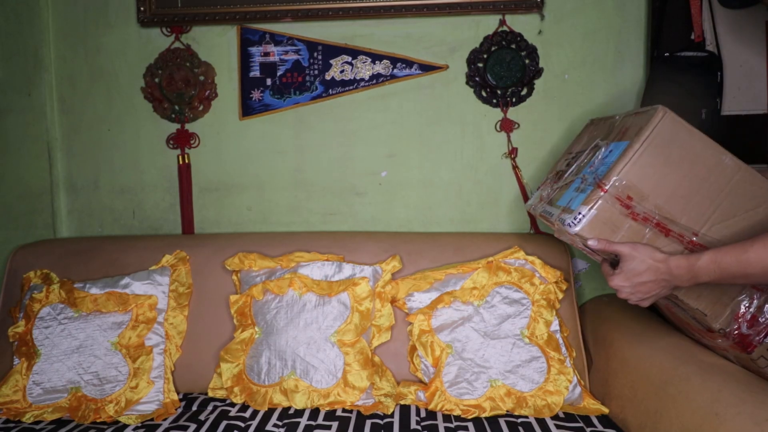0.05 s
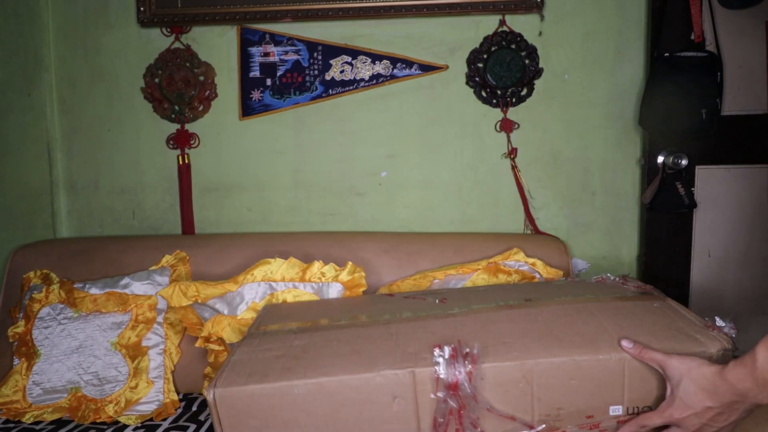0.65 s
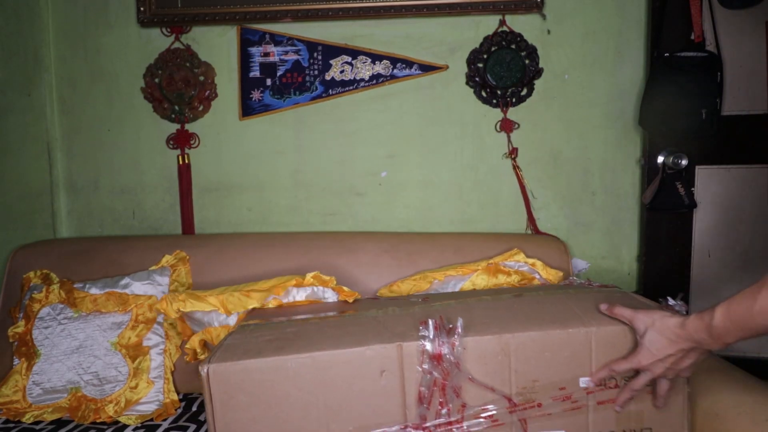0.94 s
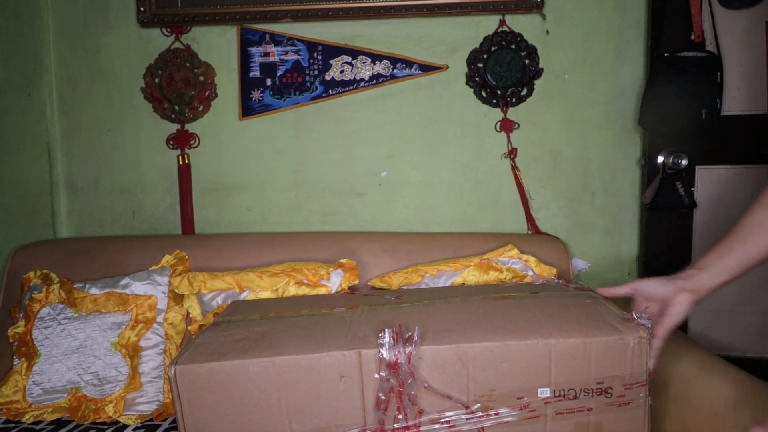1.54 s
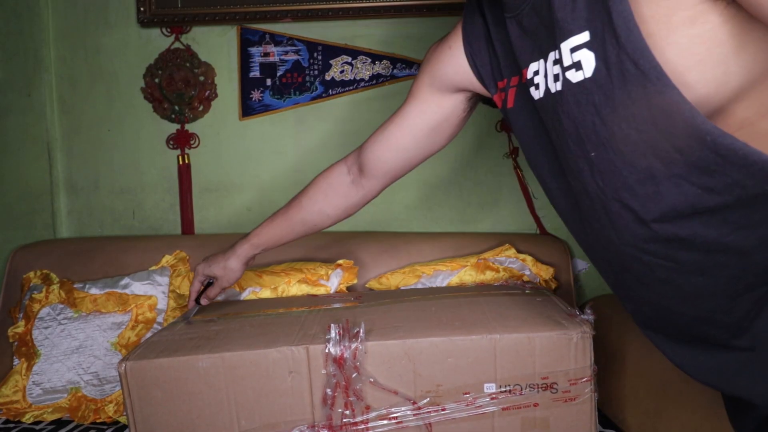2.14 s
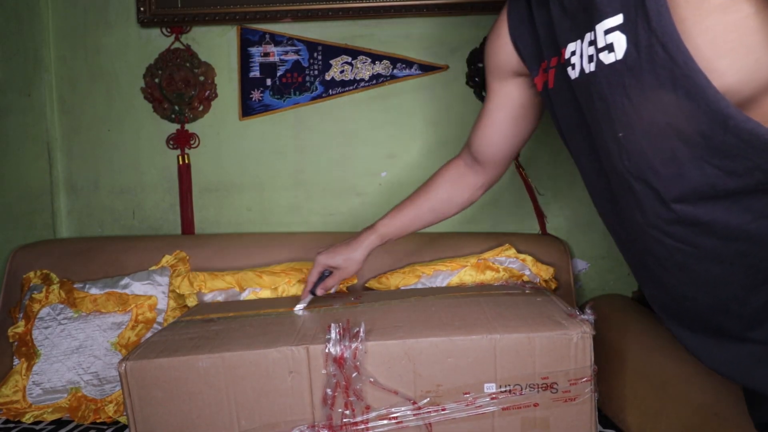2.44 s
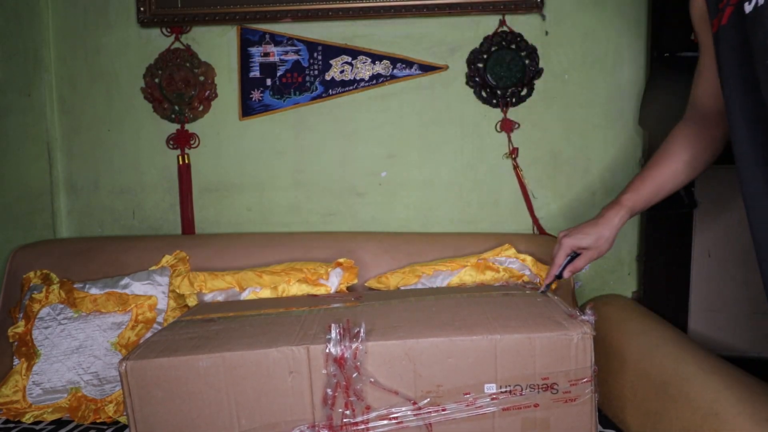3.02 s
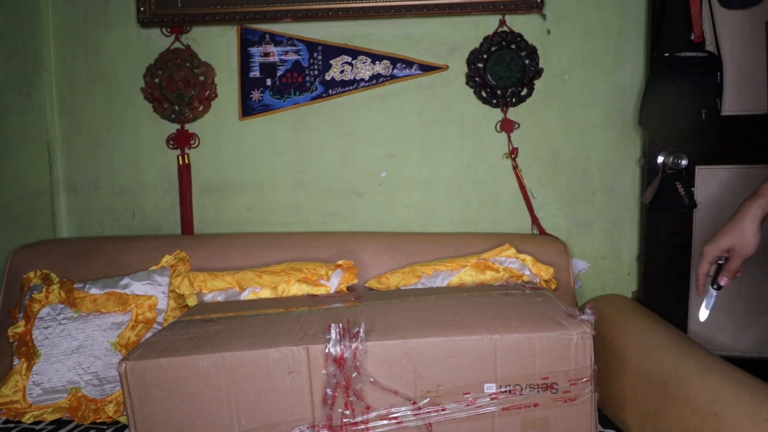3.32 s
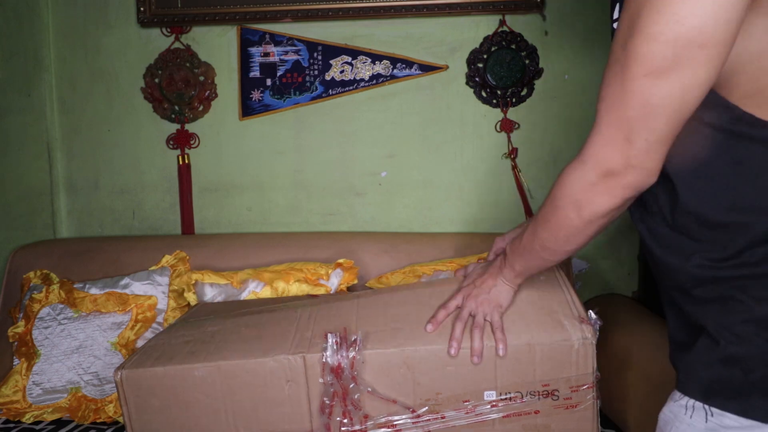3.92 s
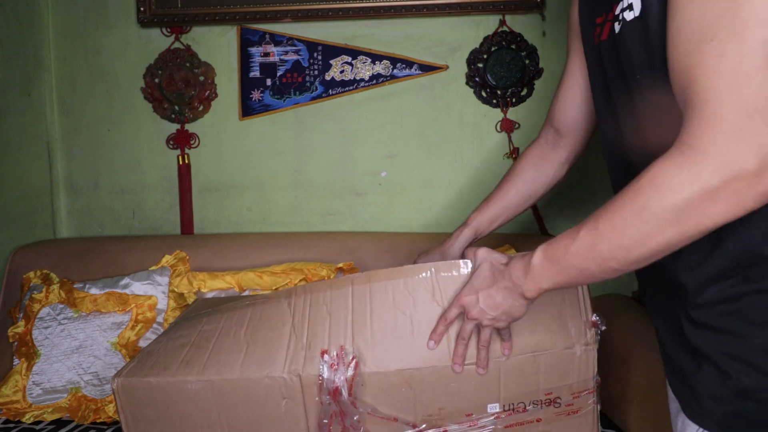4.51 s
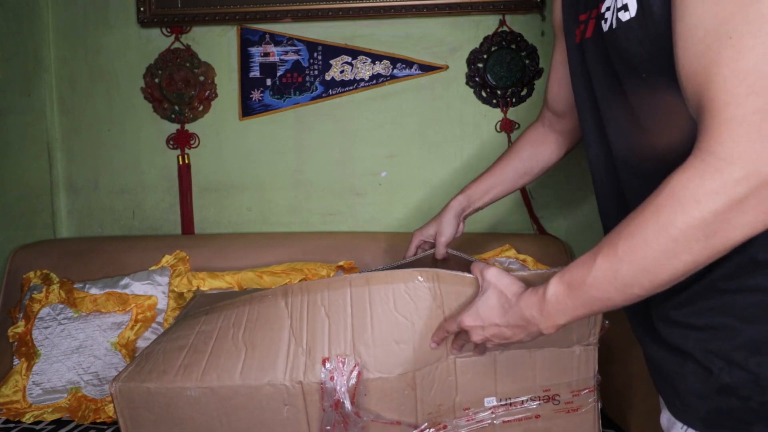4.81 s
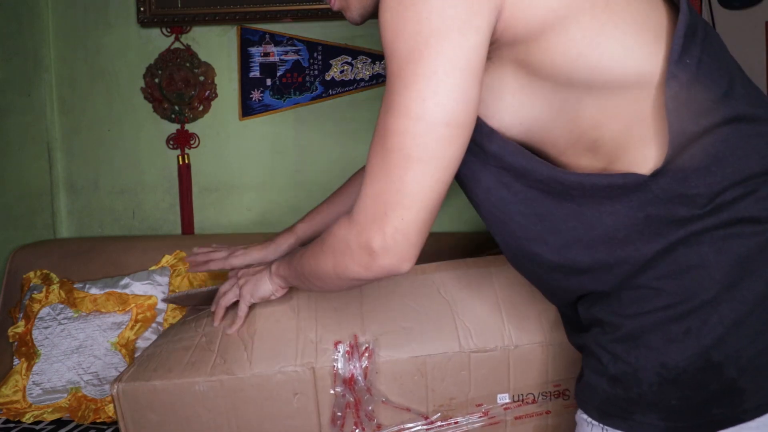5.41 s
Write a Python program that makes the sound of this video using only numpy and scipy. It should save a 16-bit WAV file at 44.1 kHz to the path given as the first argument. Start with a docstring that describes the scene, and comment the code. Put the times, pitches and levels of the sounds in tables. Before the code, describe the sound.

A large taped cardboard box scrapes onto a sofa from the start, its tape crackling, and settles with several dull thuds between 0.5 and 0.9 seconds. Hands swish over the card, and a palm drags with a brief low groan at about 1.1 seconds. A cluster of hollow knocks comes near 1.7 seconds as the box is pushed into place. From about 2.3 to 3.3 seconds a knife rasps along the seam, catching on fibres and drumming on the lid, ending with sharp ticks. After a short lull the flap is pulled, and the tape bursts in three loud snaps at about 4.0, 4.5 and 5.15 seconds, each ringing the box, with light rubbing between them. Scuffs and thumps follow until around 5.6 seconds. Everything sounds close, in a small room with a short echo and a faint steady hiss.

```python
"""In a small room, a big taped cardboard box is slid onto a sofa and pushed into place with dull thuds.
A knife is drawn along the top seam, catching on fibres and drumming on the lid. Then the flap is
pulled and the remaining tape bursts in three sharp snaps. Knocks, slides and snaps all ring the same
cardboard panels; hands swish over the card, the tape crackles and the room hisses faintly."""
import sys
import numpy as np
from scipy import signal
from scipy.fft import rfft, irfft, next_fast_len
from scipy.io import wavfile
from scipy.ndimage import uniform_filter1d

SR = 44100
rng = np.random.default_rng(int(sys.argv[2]) if len(sys.argv) > 2 else 0)


def unload_wav(signal):
    """Save mono or channel-first audio to the path in sys.argv[1] as 16-bit WAV at rate SR, clipped to [-1, 1]."""
    wavfile.write(
        sys.argv[1],
        SR,
        np.round(np.clip(np.atleast_2d(signal).T, -1, 1) * 32767).astype(np.int16),
    )


N = 249297
TIME = np.arange(N) / SR

# Levels in the tables are relative: the functions add their own gains.
# hands and cushions rub the box: start_s, attack_s, hold_s, scrape_db, drone_db, crackle_db
RUBS = [(0.021, 0.056, .01, -46, -52, -50), (0.144, 0.23, .06, -33.5, -39.5, -37.5),
        (0.492, 0.013, 0.15, -38.5, -29.5, -41.5), (0.716, 0.054, 0.05, -39, -34.5, -49),
        (0.985, 0.016, .01, -39.5, -49, -45), (1.028, 0.079, 0.1, -40, -45, -40.5),
        (1.287, 0.033, 0.0092, -41.5, -40, -44.5), (1.741, .015, .08, -40.5, -39, -47),
        (1.897, 0.032, 0.036, -43.5, -47, -53), (4.113, 0.025, .04, -46, -47.5, -58),
        (4.331, .016, 0.12, -47.5, -44, -52), (4.644, 0.028, 0.18, -47, -54, -51),
        (4.87, 0.025, 0.24, -43, -47, -46), (5.27, 0.041, 0.07, -40.5, -32.5, -55),
        (5.427, .03, .14, -45.5, -54, -54)]
# tone of the droning panels: pitch_hz, level_db
DRONE_TONE = [(50, -21), (100, -12.5), (160, -6.5), (240, -2.5), (340, -7), (430, -2), (600, -25.5),
              (1000, -38), (2000, -57)]
# tone of scraped cardboard: pitch_hz, level_db
SCRAPE_TONE = [(250, -41), (600, 6), (1100, 2), (2200, -2.5), (3500, -4.5), (5500, -11), (9000, -15),
               (15000, -32)]
# tone of crackling tape: pitch_hz, level_db
CRACKLE_TONE = [(2000, -43), (4000, -9), (6500, 4.5), (9500, -8.5), (15000, -9)]
# ringing notes of the box's panels and the air inside: pitch_hz, level_db, fade_s
BOX_NOTES = [(71, -3, 0.098), (95, -27, 0.099), (126, -0.5, 0.31), (157.7, 4, 0.18), (248, -1, 0.14),
             (290.4, -7, 0.092), (363.3, 2.5, 0.26), (553, -2, 0.13), (988, 5, 0.094), (1160, -26, 0.14),
             (1384, -4, 0.17), (1613, 0, 0.16), (1994, 1.5, 0.19), (2368, -26, .12), (2500, 2.5, 0.17),
             (3050, 4, 0.33), (3323, 7.5, 0.18)]
# gaps between the lid's notes, where it gives off little sound: pitch_hz, width_hz, depth (0 to 1)
LID_GAPS = [(452, 420, 0.29), (886, 700, 0.38)]
# the clearest ticks of tape and blade: start_s, level_db, pitch_hz
TICKS = [(0.0263, -31, 7440), (0.2184, -22, 4230), (0.3905, -15, 3630), (0.3985, -10, 4070),
         (0.4044, -19, 4250), (0.7557, -19.5, 5970), (0.8225, -25.5, 6400), (1.1338, -23.5, 6400),
         (1.1418, -20, 5560), (1.2974, -27, 6230), (1.3209, -18, 6430), (1.8352, -23.5, 3900),
         (2.0812, -32, 3370), (2.5087, -15.5, 3620), (3.1557, -22, 6740), (3.1607, -14.5, 5700),
         (3.1644, -15.5, 3670), (4.1225, -34, 3990), (4.3026, -30, 3210), (4.7077, -20, 7440),
         (4.8678, -24.5, 6230), (4.9054, -16, 5940), (5.0739, -29, 4360)]
# dry skin swishes over smooth card: start_s, length_s, level_db
SWISHES = [(0.05, 0.07, -57), (0.485, 0.13, -45.5), (1.088, 0.24, -49), (1.35, 0.13, -50.5),
           (4.11, 0.089, -62), (4.338, 0.17, -60), (5.418, 0.14, -52)]
# tone of skin on card: pitch_hz, level_db
SKIN_TONE = [(3000, -20), (6000, 3.5), (9000, 0), (12000, 0), (15500, -6.5)]
# short scuffs and rips of card and tape: start_s, level_db, pitch_hz, fade_s
SCUFFS = [(0.219, -31.5, 1880, 0.039), (0.266, -43.5, 1270, 0.33), (0.393, -31.5, 2490, 0.1),
          (0.401, -33.5, 3480, 0.3), (.571, -29, 1600, 0.07), (1.132, -35, 5870, 0.024),
          (1.441, -38.5, 6550, 0.1), (1.758, -31, 1150, 0.053), (2.621, -28.5, 830, 0.05),
          (2.803, -31.5, 1130, 0.045), (2.965, -35.5, 890, 0.16), (3.154, -31.5, 5000, 0.092),
          (4.0, -31, 2680, 0.15), (4.893, -34, 5500, 0.045), (5.243, -19, 1030, 0.067),
          (5.243, -20.5, 4300, 0.032)]
# soft knocks on the box: start_s, level_db, pitch_hz, slap_db (added to level_db)
THUDS = [(0.505, -23, 322, -5), (.524, -22, 337, -3), (0.571, -25, 307, 2.5), (0.578, -23.5, 223, -17),
         (0.6519, -16, 154, -26), (0.658, -20.5, 184, -30), (0.786, -32, 161, -19), (0.903, -38, 136, -16),
         (1.157, -27, 159, -16), (1.655, -22, 208, 7), (1.667, -20, 139, -4), (1.6777, -13, 225, -3),
         (1.693, -32.5, 280, 11.5), (1.755, -36.5, 91, -3), (1.817, -32, 255, -20), (2.485, -30, 260, -20),
         (2.598, -23.5, 300, -14), (2.621, -23, 258, -4), (2.652, -24, 202, -26), (2.802, -26, 266, -8),
         (2.98, -31, 151, -7), (4.353, -34, 132, -22), (5.252, -15.5, 380, -0.5), (5.3884, -14.5, 270, -13),
         (5.398, -30.5, 300, 8.5), (5.407, -20.5, 313, -23), (5.417, -35, 204, 7)]
# a palm drags over the lid: time_s, slips_per_s, level_db
GROAN = [(1.085, 200, -52), (1.105, 260, -35), (1.13, 235, -33), (1.15, 190, -34), (1.18, 170, -35),
         (1.21, 175, -33), (1.24, 150, -52)]
# the knife's stroke along the seam: time_s, lid_db, tape_db
KNIFE_STROKE = [(2.26, -52, -64), (2.39, -44.5, -50.5), (2.5, -37.5, -47.5), (2.506, -39, -45),
                (2.538, -40, -54.5), (2.598, -29.5, -41.5), (2.632, -34, -54), (2.79, -38, -50.5),
                (2.802, -36.5, -54.5), (2.926, -48, -54.5), (2.984, -38.5, -48.5), (3.134, -42, -51),
                (3.162, -34.5, -30.5), (3.176, -37, -39), (3.254, -54, -62), (3.28, -56, -65)]
# notes the blade rings in the lid: pitch_hz, level_db, fade_s
LID_NOTES = [(259, -13, .06), (311.6, 4, 0.14), (365.7, 0, 0.23)]
# the tape gives way in jerks and the flap whips: start_s, boom_db, boom_hz, clap_db, clap_hz, crack_db
SNAPS = [(3.9933, -8, 205, -4, 780, -1), (4, -25, 262, -6, 2240, -24), (4.4794, -11, 205, 3.5, 833, -4.5),
         (4.482, -5.5, 505, -28, 1070, -10.5), (5.1376, -48, 300, -40, 1700, -17),
         (5.1444, -31, 300, -9.5, 1700, -27), (5.149, -12, 303, -3, 1350, 2.5),
         (5.1545, -10, 215, 3.5, 930, -9), (5.161, -7, 345, -11, 1090, -13)]
# tone of tearing tape: pitch_hz, level_db
TEAR_TONE = [(100, 4), (300, -11), (1000, -1), (3000, 23), (6000, -35), (10000, 4), (15000, 9)]
# how strongly the walls send sound back: pitch_hz, level_db
WALL_TONE = [(60, -3), (160, -5), (400, -3), (1000, -1), (2500, -3), (5000, 8), (10000, -14.5), (15000, 3)]
# how long the room's echo lasts: pitch_hz, fade_s
ROOM_FADE = [(100, 0.37), (700, 0.21), (2000, 0.46), (5000, 0.1), (13000, 0.52)]
# tone of the room's hiss: pitch_hz, level_db
HISS_TONE = [(15, -62), (25, -32), (49, -11.5), (127, -9), (166, -20), (195, -9), (229, -17), (293, -8.5),
             (394, -7.5), (863, -8), (4370, -18), (16000, -45.5)]


def from_db(db):
    """Turn decibels into a number to multiply by."""
    return 10 ** (np.asarray(db) / 20)


def rms_one(x):
    """Scale a sound so that its average strength (rms) is 1."""
    return x / np.sqrt(np.mean(x ** 2) + 1e-20)


def at_hz(table, hz):
    """Read a table between its rows, with octaves evenly spaced."""
    pitches, values = np.transpose(table)
    return np.interp(np.log(np.maximum(hz, 1)), np.log(pitches), values)


def coloured(x, tone):
    """Shape a sound's lows and highs by a tone table; the result has strength 1."""
    size = next_fast_len(len(x))
    gains = from_db(at_hz(tone, np.fft.rfftfreq(size, 1 / SR)))
    return rms_one(irfft(rfft(x, size) * gains, size)[:len(x)])


def add(track, start_s, sound):
    """Mix a short sound into a track."""
    i = max(int(start_s * SR), 0)
    track[i:i + len(sound)] += sound[:N - i]


def dying(t, fade):
    """A curve that has dropped by 60 dB when t reaches `fade`."""
    return np.exp(-np.log(1000) * t / fade)


def swing(hz, cycles, rise):
    """A brief vibration that builds over `rise` cycles and dies within `cycles`; its peak is 1."""
    turns = TIME[:SR // 8] * hz
    bend = np.sin(2 * np.pi * turns) * dying(turns, cycles) * (1 - np.exp(-turns / rise))
    pressure = np.diff(bend, prepend=0)
    return pressure / np.abs(pressure).max()


def burst(tone, fade_s):
    """A short, fading spray of fibre noise."""
    t = TIME[:SR // 6]
    return coloured(rng.standard_normal(len(t)), tone) * dying(t, fade_s)


def slips(per_s, spread_db):
    """Surfaces stick and let go: tiny clicks at random moments, very uneven in size."""
    sizes = from_db(spread_db * np.minimum(rng.exponential(1, N), 4))
    return (rng.random(N) < per_s / SR) * sizes * rng.choice([-1, 1], N)


def blade_levels():
    """Levels of lid and tape under the blade in dB, and whether the blade is touching."""
    times, lid_db, tape_db = np.transpose(KNIFE_STROKE)
    touching = (TIME > times[0]) & (TIME < times[-1])
    return np.interp(TIME, times, lid_db), np.interp(TIME, times, tape_db), touching


def friction(release_s=0.087):
    """Strength of scrape, drone and crackle: the blade's stroke, plus rubs that swell, hold and let go."""
    lid_db, tape_db, touching = blade_levels()
    card_db = -41 + 0.78 * (tape_db + 50)   # the card under the tape follows its level, more gently
    strengths = touching * from_db([card_db, lid_db - 1, tape_db + 3.5])
    for start_s, attack_s, hold_s, *levels_db in RUBS:
        corners_s = start_s + np.cumsum([0, attack_s, hold_s, release_s])
        strengths += np.outer(from_db(levels_db), np.interp(TIME, corners_s, [0, 1, 1, 0]))
    return strengths


def sliding(drone_db=-4, scrape_db=-2, crackle_db=-4):
    """Coarse slips drum on the panels; finer ones scrape the paper and crackle in the tape."""
    scrape, drone, crackle = friction()
    return (from_db(drone_db) * drone * coloured(slips(per_s=630, spread_db=5.5), DRONE_TONE)
            + from_db(scrape_db) * scrape * coloured(slips(per_s=6000, spread_db=6.5), SCRAPE_TONE)
            + from_db(crackle_db) * crackle * coloured(slips(per_s=3500, spread_db=6.5), CRACKLE_TONE))


def ringing(force, notes):
    """Each push sets the cardboard ringing at its own notes."""
    t = TIME[:SR // 3]
    ring = sum(from_db(db) * np.cos(2 * np.pi * hz * t) * dying(t, fade_s) for hz, db, fade_s in notes)
    return signal.fftconvolve(force, ring / np.linalg.norm(ring))[:N]


def hollowed(x):
    """The lid gives off little sound between its notes, so those pitches are turned down."""
    for hz, width_hz, depth in LID_GAPS:
        x = x - depth * signal.lfilter(*signal.iirpeak(hz, hz / width_hz, fs=SR), x)
    return x


def ticks(tick_db=1, fray_db=-11):
    """Stiff tape buckles with a brief bright ping and a little fraying."""
    out = np.zeros(N)
    for start_s, db, hz in TICKS:
        add(out, start_s, from_db(db + tick_db) * swing(hz, cycles=5.4, rise=0.008))
        add(out, start_s, from_db(db + fray_db) * burst(CRACKLE_TONE, fade_s=0.0083))
    return out


def crinkles(per_s=45, crinkle_db=9, lowest_hz=4550):
    """Wherever tape is rubbed, small stray ticks stand out of its crackle."""
    out = np.zeros(N)
    _, _, crackle = friction()
    for place, size, octaves in rng.random((int(per_s * N / SR), 3)):
        db = crinkle_db + min(-np.log(1 - size), 3)   # a few are up to 3 dB louder
        ping = swing(lowest_hz * 2 ** octaves, cycles=3.0, rise=0.26)
        add(out, place * N / SR, crackle[int(place * N)] * from_db(db) * ping)
    return out


def swishes():
    """Skin on card: fine, even friction that swells and fades with the speed of the hand."""
    speed = np.zeros(N)
    for start_s, length_s, db in SWISHES:
        add(speed, start_s, from_db(db) * np.sin(np.linspace(0, np.pi, int(length_s * SR))))
    return speed * coloured(rng.standard_normal(N), SKIN_TONE)


def scuffs(width=0.56, rise_s=0.0014):
    """A quick rub: crowded slips blur into one broad band of noise that swells and dies away."""
    out, t = np.zeros(N), TIME[:SR // 3]
    for start_s, db, hz, fade_s in SCUFFS:
        band = signal.iirpeak(hz, 1 / width, fs=SR)
        rub = signal.lfilter(*band, rng.standard_normal(len(t)))
        rub = rms_one(signal.lfilter(*band, rub))
        add(out, start_s, from_db(db) * rub * dying(t, fade_s) * (1 - np.exp(-t / rise_s)))
    return out


def heave(hz=80):
    """A short, deep push of air, as when the whole box rocks on the cushions."""
    return swing(hz, cycles=2.0, rise=0.45)


def thuds(slap_db=-6, heave_db=-18):
    """A panel bends and springs back, the box rocks, and the contact adds a papery slap."""
    out = np.zeros(N)
    for start_s, db, hz, own_slap_db in THUDS:
        panel = swing(hz, cycles=3.9, rise=0.49)
        add(out, start_s, from_db(db) * (panel + from_db(heave_db) * heave()))
        add(out, start_s, from_db(db + own_slap_db + slap_db) * burst(SCRAPE_TONE, fade_s=0.025))
    return out


def groan(overtone=0.0529, wobble=0.09, grip_db=1.5):
    """A palm sticks and slips, unsteady in rate and grip, and flexes the lid."""
    times, per_s, db = np.transpose(GROAN)
    unsteady, grip = rms_one(uniform_filter1d(rng.standard_normal((2, N)), SR // 150, axis=1))
    pitch_hz = np.interp(TIME, times, per_s) * (1 + wobble * unsteady)
    phase = 2 * np.pi * np.cumsum(pitch_hz) / SR
    level = np.interp(TIME, times, from_db(db), left=0, right=0) * from_db(grip_db * grip)
    return level * (np.sin(phase) + overtone * np.sin(2 * phase))


def knife(per_s=140, uneven=0.25, knife_db=-5):
    """The blade catches and jumps, fibre after fibre, and drums on the lid."""
    lid_db, _, touching = blade_levels()
    gaps, sizes = np.exp(uneven * rng.standard_normal((600, 2))).T
    times = KNIFE_STROKE[0][0] + np.cumsum(gaps) / per_s
    catches = np.bincount((times * SR).astype(int), sizes, N)[:N]   # one click for each catch
    rasp = ringing(catches, LID_NOTES) * np.sqrt(SR / per_s)
    return touching * from_db(lid_db + knife_db) * rasp


def snaps(clap_lag_s=0.00045, boom_lag_s=0.0011, tear_db=-15, heave_db=-14):
    """The tape cracks and tears, the flap's edge claps, then the whole lid booms."""
    out = np.zeros(N)
    for start_s, boom_db, boom_hz, clap_db, clap_hz, crack_db in SNAPS:
        crack_hz = 4800 * 2 ** (crack_db / 49)   # a harder jerk cracks higher: an octave per 49 dB
        add(out, start_s, from_db(crack_db) * swing(crack_hz, cycles=2.9, rise=1.2))
        add(out, start_s, from_db(crack_db + tear_db) * burst(TEAR_TONE, fade_s=0.013))
        add(out, start_s + clap_lag_s, from_db(clap_db) * swing(clap_hz, cycles=2.5, rise=0.74))
        boom = swing(boom_hz, cycles=3.56, rise=0.94) + from_db(heave_db) * heave()
        add(out, start_s + boom_lag_s, from_db(boom_db) * boom)
    return out


def flap_puff(start_s=5.155, puff_db=-18):
    """The freed flap flies open and pushes a puff of air."""
    out = np.zeros(N)
    add(out, start_s, from_db(puff_db) * heave(hz=71))
    return out


def linger(power, fade_s):
    """Spread a sound's energy into a tail that drops 60 dB in fade_s."""
    keep = from_db(-120 / (fade_s * SR))
    return signal.lfilter([1 - keep], [1, -keep], power)


def room(x, early_db=-6, early_fade_s=0.04, late_db=-8, build_s=0.14):
    """Blurred echoes by octave: a quick scatter off the box and near wall, then the room's short tail."""
    out, noise = np.zeros(N), rng.standard_normal((2, N))
    edges_hz = np.geomspace(45, 18000, 10)
    for k, (low, high) in enumerate(zip(edges_hz, edges_hz[1:])):
        band = signal.butter(2, [low, high], "band", fs=SR, output="sos")
        middle_hz = np.sqrt(low * high)
        power = signal.sosfilt(band, x + 1e-9 * noise[0]) ** 2
        early = from_db(early_db) ** 2 * linger(power, early_fade_s)
        late = from_db(late_db) ** 2 * linger(linger(power, build_s), at_hz(ROOM_FADE, middle_hz))
        wash = rms_one(signal.sosfilt(band, noise[k % 2]))
        out += from_db(at_hz(WALL_TONE, middle_hz)) * np.sqrt(early + late) * wash
    return out


def scene(ring_db=-16, slide_db=-3.5, tick_room_db=-4, hiss_db=-46.5):
    """Knocks, snaps and slides ring the box; these, the rubs and the tape echo over a steady hiss."""
    contacts = thuds() + snaps() + flap_puff() + from_db(slide_db) * sliding()
    box = contacts + from_db(ring_db) * ringing(contacts, BOX_NOTES)
    rubs = groan() + knife() + scuffs() + swishes()
    tape = ticks() + crinkles()
    echoes = room(box + rubs + from_db(tick_room_db) * tape)   # the tape faces the microphone: less echo
    hiss = from_db(hiss_db) * coloured(rng.standard_normal(N), HISS_TONE)
    return (hollowed(box + echoes) + rubs + tape + hiss)[None]


def record(dry, bass_hz=42, limit=0.93, top_hz=16000):
    """The microphone drops the deepest bass, overloads on the loudest snaps and loses the top treble."""
    bass_cut = signal.butter(2, bass_hz, "high", fs=SR, output="sos")
    treble_cut = signal.ellip(10, 0.1, 80, top_hz, fs=SR, output="sos")
    overloaded = np.clip(signal.sosfilt(bass_cut, dry), -limit, limit)
    return signal.sosfilt(treble_cut, overloaded)


dry = scene()
out = record(dry)
unload_wav(out)
```